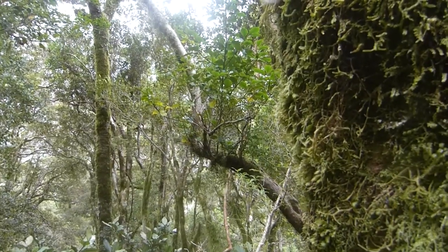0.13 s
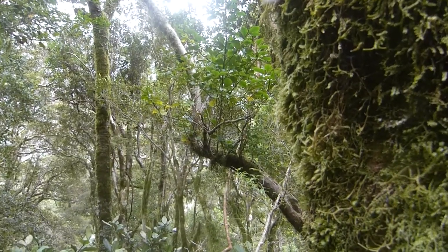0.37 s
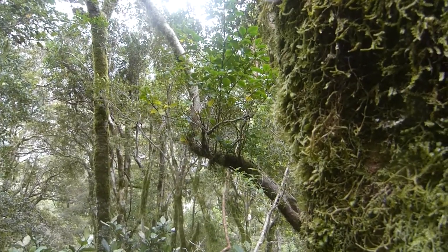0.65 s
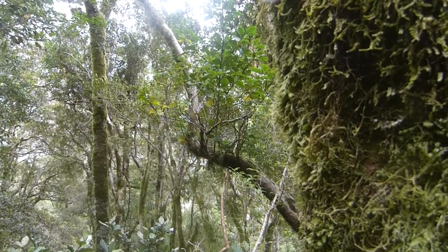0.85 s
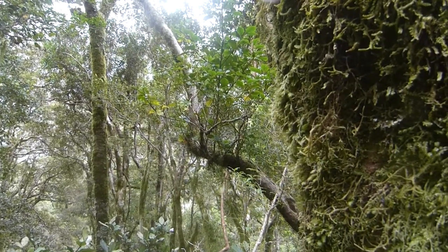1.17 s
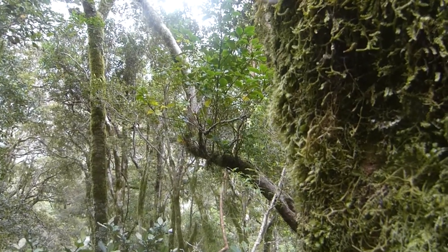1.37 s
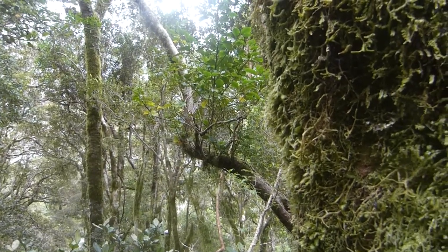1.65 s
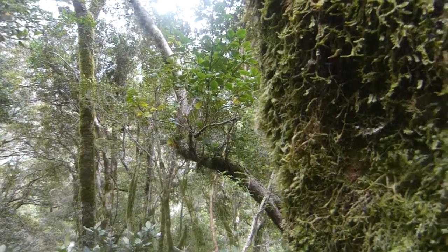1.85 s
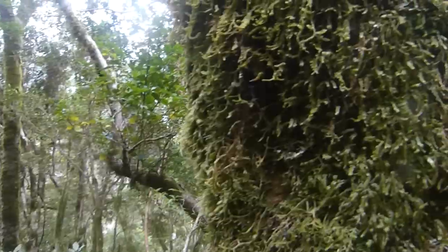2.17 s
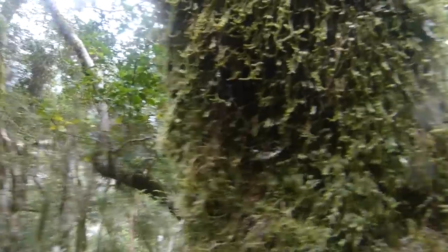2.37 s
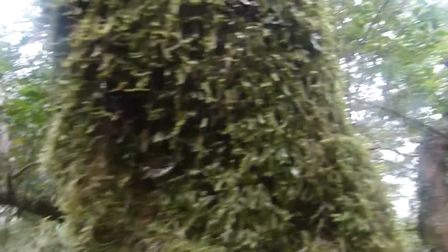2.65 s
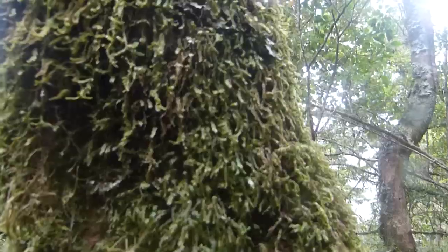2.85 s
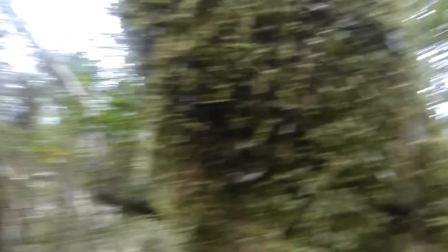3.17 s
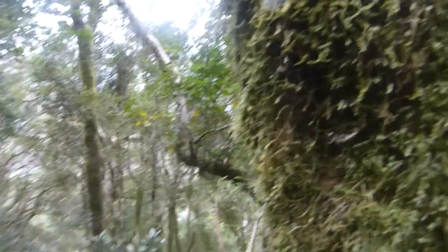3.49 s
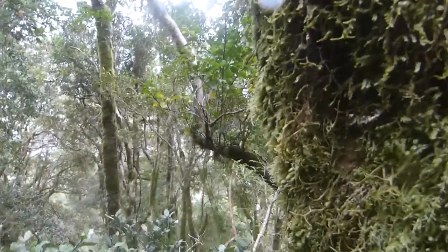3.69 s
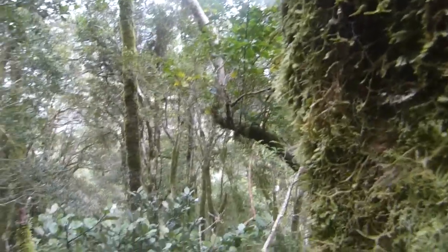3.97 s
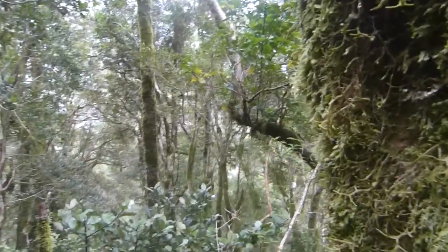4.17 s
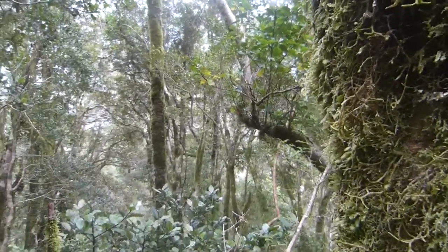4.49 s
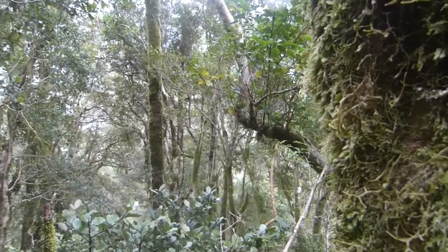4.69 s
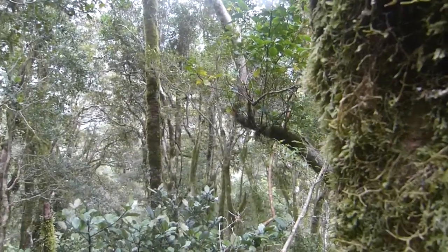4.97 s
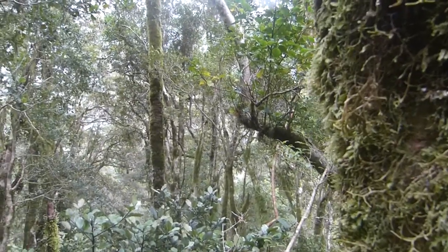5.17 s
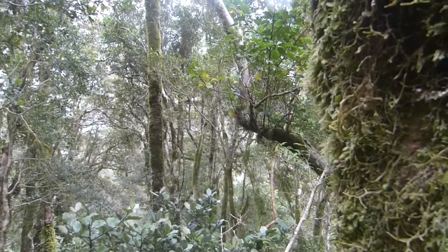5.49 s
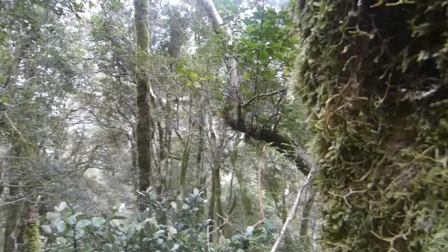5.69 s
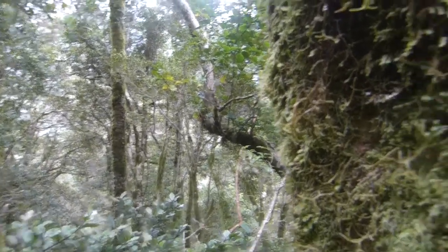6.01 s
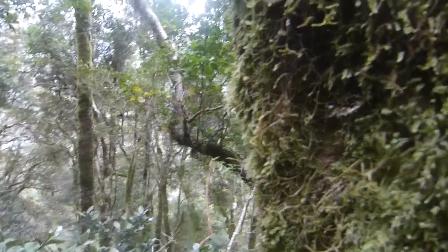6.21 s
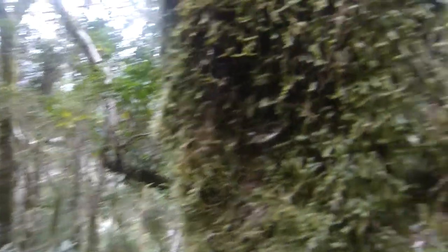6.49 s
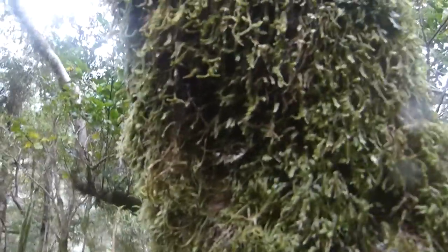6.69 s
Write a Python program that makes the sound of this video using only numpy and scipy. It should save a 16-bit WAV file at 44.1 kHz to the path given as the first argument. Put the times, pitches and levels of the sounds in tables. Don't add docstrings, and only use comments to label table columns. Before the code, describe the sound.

Outdoors in forest, a faint, smooth wash of distant river and leaves runs throughout. A few twig ticks, then jacket rustle, creaks and a dull knock as the hand-held camera turns. Off to the left a stag moans low, climbs in pitch and breaks into a hoarse, ringing roar that echoes among trunks. After a quiet gap, quick finger catches and a scrape on the camera body, then more rustling.

```python
import sys
import numpy as np
from scipy import signal
from scipy.fft import rfft, irfft, next_fast_len
from scipy.io import wavfile
from scipy.ndimage import uniform_filter1d

SR = 44100
rng = np.random.default_rng(int(sys.argv[2]) if len(sys.argv) > 2 else 0)


def waveform_to_disk(signal):
    frames = np.transpose(np.atleast_2d(signal))
    scaled = np.clip(frames, -1, 1) * 32767
    samples = np.round(scaled).astype(np.int16)
    wavfile.write(sys.argv[1], SR, samples)


def voltage_ratio(decibels):
    exponent = np.asarray(decibels, float) / 20
    return 10 ** exponent


N = 302085

# freq_hz, level_db per Hz
WASH_TONE = [(12, -44), (20, -16.5), (113, -12), (141, -5), (291, -5), (364, -1), (468, -2.5), (692, -3),
             (818, -4), (1470, -7), (3490, -19.5), (7620, -21.5), (15700, -33)]
WASH_DB = -53.5
# freq_hz, likeness (-1 to 1)
WASH_LIKENESS = [(60, 0.92), (150, 0.22), (380, -0.47), (950, 0.15), (2380, 0.28), (5980, 0.47),
                 (15000, 0.4)]

# start_s, peak_db, centre_hz,
# pan_db (left over right), width_hz
TICKS = [(0.1812, -42, 2450, -3, 1200), (1.347, -41, 4450, -.5, 3500), (1.5744, -43, 3870, -.5, 1500),
         (1.577, -49, 7350, -.5, 2500), (1.759, -44, 6400, -3, 5000), (1.8824, -42, 7550, -6, 3000),
         (1.882, -40, 3700, -2, 2500), (1.95, -45.5, 6940, -11, 3030), (2.091, -37.5, 2130, 10, 1500),
         (2.2055, -46, 2500, -6, 2500), (2.358, -39, 2280, -1, 2000), (2.691, -42, 3880, -15, 1500),
         (2.798, -40, 6500, -5, 3000), (2.935, -43, 7160, -7, 3970), (3.031, -44, 6000, -4, 3930),
         (3.4185, -31.5, 6212, -5, 2500), (3.543, -46, 4900, 2, 4044), (5.876, -39, 700, 0, 700),
         (5.903, -36.5, 850, 0, 600), (6.04, -51, 6000, -11, 4000), (6.148, -39, 4370, -3, 5000),
         (6.45, -41, 4450, -21, 6000), (6.514, -38.5, 4970, -18, 6000), (6.572, -50, 5940, -12, 5000),
         (6.64, -41, 4500, -15, 6080), (6.677, -40.5, 2840, -18, 3500), (6.732, -40, 5460, -10, 6000)]
# start_s, peak_db, pitch_hz, pan_db
KNOCK = (2.2049, -26.5, 520, -5)
LIPS_T60 = 0.45
# freq_hz, t60_s
FOREST_T60 = [(200, 1.65), (600, 0.55), (900, 1.08), (1300, 0.82), (2400, LIPS_T60), (4000, 0.67),
              (9000, 0.14)]

# start_s, rise_s, hold_s, fall_s, level_db
RUSTLE = [
    (1.93, 0.01, 0.045, 0.061, -63),
    (2.0, 0.037, 0.026, 0.07, -56.5),
    (2.086, 0.015, 0.051, 0.22, -49.5),
    (2.45, 0.099, 0.11, 0.11, -52),
    (2.62, 0.13, 0.26, 0.29, -52),
    (3.17, 0.17, 0.027, 0.61, -48.5),
    (6.44, 0.08, 0.1, .04, -55),
    (6.6, 0.097, 0.03, 0.23, -51.5),
]
# freq_hz, level_db per Hz
CLOTH_TONE = [(60, -45), (200, -8.5), (1650, -7), (2800, -8), (3710, -9.5), (4360, -6.5), (4740, -5.5),
              (5390, -8), (6250, -7.5), (7250, -7), (10500, -15.5), (13000, -23)]
# freq_hz, width_hz, level_db
SLEEVE_MODES = [(950, 150, 5), (1740, 93, 8), (2200, 710, -7.5)]
# start_s, rise_s, hold_s, fall_s, level_db
SLEEVE_RUBS = [
    (6.44, 0.046, 0.15, 0.044, -42.5),
    (6.62, 0.081, 0.035, 0.16, -41.5),
]
# start_s, rise_s, hold_s, fall_s, level_db
CREAKS = [
    (2.083, 0.01, 0.059, .02, -45),
    (2.15, .02, 0.021, .07, -54),
    (2.7, 0.099, 0.0075, .1, -58),
    (3.2, 0.085, 0.045, .15, -76),
]
CREAK_HZ = 5200

# start_s, rise_s, hold_s, fall_s, level_db
ARM_SHIFTS = [
    (1.95, 0.058, 0.045, .03, -69),
    (2.0, 0.23, 0.017, 0.027, -49),
    (2.42, 0.098, .25, .1, -47.5),
]
# freq_hz, level_db
ARM_TONE = [(40, -60), (100, -26), (170, 9.5), (400, 3.5), (900, 9), (1600, -1), (2800, -1), (4000, -20)]

# start_s, rise_s, hold_s, fall_s, level_db
FLEX = [
    (2.0, 0.22, .0, .1, -34.5),
    (2.45, 0.18, 0.016, 0.36, -37),
    (5.845, 0.0058, 0.025, 0.024, -30),
    (5.866, 0.014, 0.046, .03, -27),
    (5.895, 0.022, 0, 0.12, -29.5),
    (6.0, .1, 0.34, 0.22, -49),
    (6.44, .07, .22, .25, -34),
]
# freq_hz, width_hz, level_db
FLEX_MODES = [(706, 91, -2), (402, 160, -18)]
HAND_REST_DB = -56.5
STROKE_DB = 6

# time_s, effort_db, pan_db
ROAR = [
    (2.62, -49, -7),
    (2.85, -44.5, 14),
    (3.1, -41, 8.5),
    (3.22, -28, 11.5),
    (3.38, -27, 10.5),
    (3.6, -21.5, 4),
    (4.0, -20, 4.5),
    (4.6, -21.5, 4),
    (4.86, -50.5, 0.5),
]
# time_s, opening (0-1)
MOUTH = [
    (2.62, 0.37),
    (3.15, 1),
    (3.4, 0.44),
    (3.62, 0.64),
    (3.7, 0.94),
    (3.9, 0.93),
    (4.0, 0.57),
    (4.5, 0.38),
    (4.68, 0.74),
]
# time_s, pitch_hz
PITCH = [(2.619, 98.8), (2.779, 110.4), (2.86, 117.1), (2.9, 132.5), (2.939, 142.7), (3.021, 151.2),
         (3.099, 160.4), (3.16, 175.1), (3.26, 191), (3.3, 203.4), (3.35, 225), (3.4, 241.5),
         (3.441, 249.2), (3.58, 254.2), (3.647, 265.2), (3.7, 253.8)]
# time_s, pitch_hz
UNDERTONE = [
    (3.62, 181),
    (3.865, 181.5),
    (3.875, 366),
    (4.0, 370),
    (4.3, 371),
]
# time_s, steady, lower, chaos (each 0-1)
FOLDS = [(2.6, 1, 0, .3), (3.1, 1, 0, .22), (3.26, 1, 0, .22), (3.33, 1, 0, .35), (3.43, 1, 0, .1),
         (3.59, 1, 0, .1), (3.63, 1, .1, .4), (3.68, .55, .75, .7), (3.84, .35, .75, .75),
         (3.9, .1, .35, 1), (4.24, 0, .3, 1), (4.3, 0, 0, 1)]
NECK_HZ, MAIN_HZ, PALATE_HZ, JAW_HZ = 370, 532, 877, 728
# freq_hz, width_hz, level_db
THROAT = [(203, 200, -18), (275, 49, -2.3), (NECK_HZ, 43, 1.6), (MAIN_HZ, 44.4, 9.1),
          (PALATE_HZ, 28.5, 12.9), (JAW_HZ, 66, -10), (1003, 48, 0), (1298, 66, -3.5), (1503, 81, -3.5),
          (1640, 134, -6.5), (1765, 62, -4), (2003, 80, -12.5), (2277, 101, -9), (2428, 170, -10),
          (2575, 296, -18.5)]
# freq_hz, width_hz, level_db
TOP_CAVITIES = [(2837, 51, -2), (3240, 98, -3.5), (3478, 174, -4), (4023, 152, 3), (4886, 410, -6.5),
                (5340, 120, -10.5), (6135, 120, -11)]
# freq_hz, level_db
NECK_LEAK = [(120, -65), (200, -28.5), (320, -3.5), (450, 2.5), (620, -2.5), (800, -15), (1100, -20),
             (1800, -36), (2600, -82), (3200, -92)]
# freq_hz, width_hz, depth (0-1)
SIDE_POCKETS = [(1117, 234, 0.75), (1454, 81, 0.51), (1876, 126, 1)]
# freq_hz, width_hz
TOP_POCKETS = [(3040, 135), (3750, 150)]
# time_s, depth_db, length_s
CATCHES = [(2.883, 3, 0.029), (3.001, 3.5, 0.044), (3.321, 6.5, 0.084), (3.682, 5, 0.014),
           (3.794, 9.5, 0.017), (3.886, 0, 0.056), (4.013, -0.5, 0.026), (4.157, 0, 0.0076),
           (4.32, -1, 0.019), (4.53, 5, 0.068)]
OPEN_DB = {"chest": -3.5, "neck": -4, "main": -2.5, "palate": 3.5, "jaw": 4.5, "cheek": 7.5, "tongue": 6.5,
           "mouth": 11, "nose": 7.5, "lips": 13, "top": 9, "breath": 3.5}
SHUT_DB = {"chest": 0.5, "neck": -5.5, "main": 1, "palate": -5, "jaw": -3, "cheek": 0.3, "tongue": 2.4,
           "mouth": 0.9, "nose": 1, "lips": -2.5, "top": -32, "breath": -31}
STEADY_DB = {"main": -2, "cheek": 1, "tongue": -3.5, "chest": 0.5, "neck": -11.5, "palate": -6.5, "lips":
             -3, "top": 12}
# freq_hz, level_db per Hz
BREATH_TONE = [(1800, -37), (2600, -11), (3400, 1), (5200, -8), (6800, -0.5), (8400, -2), (10200, -11.5),
               (13000, -17)]
FLARES = {"neck": [(2.92, 17, .05), (3.27, 18, 0.034), (3.7, -9, .08), (3.33, 6, 0.043), (3.9, 8, 0.033),
          (4.0, 6.5, 0.17), (4.24, -12, 0.044), (4.15, 8, 0.074), (4.7, -8, 0.089), (4, 8, 0.044)],
          "main": [(2.73, 11.5, 0.081), (2.84, 2, 0.035), (2.95, 10, 0.039), (3.05, -17, 0.041),
          (3.2, 9, 0.09), (3.36, -14, 0.057), (3.5, -2, 0.025), (3.44, -6, 0.034), (3.635, -1.5, 0.015),
          (3.675, -20, 0.022), (3.72, 6, .025), (3.775, -7.5, .025), (3.84, 4, 0.031), (3.9, -15, 0.028),
          (3.99, 11.5, 0.044), (4.14, -6, 0.062), (4.25, 9, 0.048), (4.33, 9, 0.035), (4.44, 3, 0.043),
          (4.53, -22, 0.027), (4.59, 8.5, .03), (4.64, -9, .015), (4.68, -3, .025)],
          "palate": [(2.95, -5, .2), (3.2, -1, 0.037), (3.36, 3, .1), (3.7, 3, 0.05), (3.8, -2, 0.049),
          (4.13, 8, 0.087), (4.29, -5, .035), (4.4, 4, 0.059), (4.53, -5, 0.038), (4.62, 6.5, 0.043),
          (4.78, -3, 0.09)], "top": [(3.62, -8.5, 0.048), (4.17, 5, 0.043), (4.86, 2, 0.058)]}
BROAD_FLARES = {"mouth": [(2.75, -6, 0.18), (3.25, -9.5, 0.38), (3.43, 10, 0.033), (3.55, 6, 0.058),
                (4.5, -0.5, 0.086), (4.78, -2, 0.062)], "jaw": [(2.9, -7, 0.26), (3.32, -5.5, 0.13),
                (3.47, -10.5, 0.11), (3.62, 8, 0.035), (3.78, 9.5, 0.13), (4.0, 5, .08), (4.2, 10, 0.14),
                (4.6, -5, 0.15)], "cheek": [(2.75, -4, 0.2), (3.03, 1, .04), (3.18, 2.5, 0.03),
                (3.32, -3.5, 0.13), (3.49, 4.5, 0.048), (3.72, 5.5, 0.13), (3.85, -1.5, 0.04),
                (4.05, 5, 0.17), (4.4, 5.5, 0.11), (4.6, -2.5, 0.11)], "tongue": [(2.75, -0.5, 0.24),
                (3.12, -2, .04), (3.27, 3.5, 0.059), (3.45, -8, .05), (3.63, 6, 0.072), (3.8, 3.5, 0.074),
                (4.33, 7, 0.055), (4.65, -7, 0.073)], "nose": [(2.85, 10, 0.11), (3.05, 4.5, 0.085),
                (3.3, 0.5, 0.12), (3.46, 5.5, 0.082), (3.55, -1, .04), (3.8, 7, 0.079), (4.4, 1, 0.28)],
                "lips": [(3.6, 2.5, 0.051), (2.3, 4, 0.14), (3.2, 4, 0.096), (3.9, -2.5, 0.052),
                (4.82, 6, 0.048), (2.93, -15, 0.13), (4.66, 3.5, 0.1), (3.8, 4.5, 0.071)],
                "wall": [(2.78, -9, 0.063), (3.0, 2.5, 0.053), (3.3, -2, 0.076), (4.0, -2, .3),
                (4.5, 2.5, 0.11), (4.74, 5.5, 0.064)], "chest": [(3.4, 2.5, 0.17), (3.48, -9, 0.088),
                (3.3, 5.5, .04), (3.73, 4, 0.12), (4.71, 6, .1), (3.35, 1.5, 0.1), (3.95, 0, 0.082),
                (4.45, 4.5, 0.063)], "breath": [(3.77, 8.5, 0.078), (4.68, 7.5, 0.067)]}
# time_s, freq_factor
TOP_SHIFT = [(3.0, .985), (3.4, .985), (3.6, 1.003), (3.85, 1.01), (4.2, .995), (4.55, .993), (4.8, .98)]
# time_s, gain_db, length_s
TOP_FLARES = [
    [(3.4, 2, .25), (3.85, -5, .15), (4.4, 5.5, .12), (4.66, 11, .06)],
    [(3.35, 7, .08), (4.1, 6.5, 0.19)],
    [(3.3, -1, 0.15), (3.76, 1.5, 0.099), (4.35, -2.5, .15), (4.7, 11, 0.092)],
    [(3.2, -1, 0.09), (3.38, -12, 0.05), (3.82, -4.5, 0.16), (4.2, -0.5, .1), (4.45, -2, 0.12)],
    [(3.25, -5, 0.18), (3.8, -1.5, 0.091), (4.65, 7, .08)],
    [(3.3, -1, .2), (4.65, 6, 0.13)],
    [(3.3, -3.5, .2), (4.55, -0.5, .15)],
]
FITS_DB, FITS_HZ, PATCHY_DB = 1.8, 12.0, 3.0

# time_s, level_db
SCRAPE = [
    (5.845, -64),
    (5.9, -62),
    (5.913, -44),
    (5.93, -41),
    (5.949, -37.5),
    (5.987, -41.5),
    (6.005, -49),
    (6.035, -70),
]
# start_s, peak_db, length_s
SLIPS = [
    (5.8455, -28, 0.0042),
    (5.868, -26.5, 0.0093),
    (5.898, -25, 0.0063),
    (5.904, -25, 0.0032),
]
# freq_hz, width_hz, level_db
SHELL_MODES = [(890, 34, -4), (1500, 510, -9.5), (2730, 160, -2), (3520, 480, -6), (4790, 170, 0.5),
               (5400, 220, -9), (6150, 270, -3.5), (6660, 220, -2.5), (7980, 300, 0), (8260, 160, 0.5),
               (8460, 140, 1), (9340, 400, -15), (10500, 650, -20)]
# time_s, level_db
MOUNT_HUM = [(5.845, -57), (5.885, -53), (5.897, -66), (5.907, -51), (5.936, -45), (5.955, -54),
             (5.98, -63)]
MOUNT_HZ = 163.4

# freq_hz, level_db
BAND_LIMIT = [(15720, 0), (15790, -90)]


def evened(x):
    return x / np.sqrt(np.mean(x ** 2) + 1e-20)


def read(points, hz):
    f, value = np.transpose(points)
    return np.interp(np.log(hz + 1), np.log(f + 1), value)


def follow(t, points):
    return np.interp(t, *np.transpose(points))


def unroll(rows):
    s, *columns = np.transpose(rows)
    t = np.arange(s[0], s[-1], 1 / SR)
    return [t] + [np.interp(t, s, column) for column in columns]


def add(mix, start_s, sound, pan_db=0.0):
    part = mix[:, round(start_s * SR):][:, :np.shape(sound)[-1]]
    panned = sound * voltage_ratio(np.array([[0.5], [-0.5]]) * pan_db)
    part += panned[:, :part.shape[1]]


def drift(size, hz):
    coarse = rng.standard_normal(size // 32 + 2)
    slow = signal.sosfiltfilt(signal.butter(2, hz, fs=SR / 32, output="sos"), coarse)
    return np.interp(np.arange(size) / 32, np.arange(len(slow)), evened(slow))


def strokes(rows):
    t = np.arange(0, N + 16, 16) / SR
    out = 0
    for start, rise, hold, fall, db in rows:
        up = (t - start) / rise
        down = (start + rise + hold + fall - t) / fall
        shape = np.clip(np.minimum(up, down), 0, 1)
        out = out + (voltage_ratio(STROKE_DB * (shape - 1)) - voltage_ratio(-STROKE_DB)) * voltage_ratio(db)
    return np.interp(np.arange(N) / SR, t, out)


def bumps(t, rows):
    return sum(db * np.exp(-((t - s) / length) ** 2) for s, db, length in rows)


def resonate(x, hz, width):
    r = np.exp(-np.pi * width / SR)
    if np.ndim(hz) == 0:
        return 2 * signal.lfilter([1 - r], [1, -r * np.exp(2j * np.pi * hz / SR)], x + 1e-18).real
    turn = np.exp(2j * np.pi * np.cumsum(hz) / SR)
    return 2 * (turn * signal.lfilter([1 - r], [1, -r], x / turn)).real


def body(x, modes, factor=0.99, fits_db=0.0):
    out = 0
    for k, (hz, width, db) in enumerate(modes):
        fits = fits_db * drift(len(x), FITS_HZ) if np.any(fits_db) else 0
        out = out + (-1) ** k * voltage_ratio(db + fits) * resonate(x, hz * factor, width)
    return out


def coloured(x, spectrum):
    size = next_fast_len(len(x))
    return irfft(rfft(x, size) * voltage_ratio(read(spectrum, np.fft.rfftfreq(size, 1 / SR))), size)[:len(x)]


def crackle(size, per_s, spread_db):
    snaps = rng.standard_normal(size) * voltage_ratio(spread_db * np.minimum(rng.exponential(1, size), 4))
    return snaps * (rng.random(size) < per_s / SR)


def wash():
    frames, hz = N // 256 + 5, np.fft.rfftfreq(1024, 1 / SR)
    a, b, c, d, patches = rng.standard_normal((frames, 513, 5)).T
    patches = uniform_filter1d(patches, size=14, axis=0)
    patches = evened(uniform_filter1d(patches, size=20, axis=1))
    same = read(WASH_LIKENESS, hz)[:, None]
    left = a + 1j * b
    right = same * left + np.sqrt(1 - same ** 2) * (c + 1j * d)
    z = np.array([left, right]) * voltage_ratio(read(WASH_TONE, hz)[:, None] + 0.8 * patches)
    out = signal.istft(z, nperseg=1024, noverlap=768)[1][:, :N]
    return voltage_ratio(WASH_DB) * out / np.std(out.mean(0))


def ticks():
    out, t = np.zeros((2, N)), np.arange(600) / SR
    for s, db, hz, pan_db, width in TICKS:
        grain = rng.standard_normal(len(t)) * np.exp(-t / 0.0021)
        snap = resonate(resonate(grain, hz, width), hz, width)
        add(out, s, voltage_ratio(db) * snap / abs(snap).max(), pan_db)
    s, db, hz, pan_db = KNOCK
    u = t - 0.004
    blow = np.cos(2 * np.pi * hz * u * (1 - 90 * u) + 0.5) * np.exp(-(u / 0.0014) ** 2)
    blow += 0.42 * resonate(rng.standard_normal(len(t)), 1600, 3000) * np.exp(-(u / 0.0026) ** 2)
    add(out, s - 0.004, voltage_ratio(db) * blow / abs(blow).max(), pan_db)
    return out


def forest(x):
    taps = np.zeros((2, SR))
    at = np.arange(400, SR - 20, 20) + rng.integers(0, 20, (2, (SR - 401) // 20))
    np.put_along_axis(taps, at, rng.choice([-1.0, 1.0], at.shape), 1)
    taps[1] = 0.4 * taps[0] + 0.92 * taps[1]
    hz, t, z = signal.stft(taps, SR, nperseg=256)
    decay = voltage_ratio(-60 * t / read(FOREST_T60, hz)[:, None])
    tail = signal.istft(z * decay, SR, nperseg=256)[1]
    return signal.fftconvolve(x, tail / np.linalg.norm(tail[0]), axes=1)[:, :N]


def rustle():
    out = np.zeros((2, N))
    hiss = strokes(RUSTLE) * voltage_ratio(1.1 * drift(N, 25))
    creaks = strokes(CREAKS)
    shared = crackle(N, 9000, 1.0)
    for ear in out:
        rub = shared + 1.9 * crackle(N, 9000, 1.0)
        fold = resonate(resonate(rub, CREAK_HZ, 710), CREAK_HZ, 790)
        ear += voltage_ratio(10.5) * hiss * evened(coloured(rub, CLOTH_TONE)) + creaks * evened(fold)
    sleeve = evened(body(crackle(N, 5000, 1.0), SLEEVE_MODES))
    add(out, 0, strokes(SLEEVE_RUBS) * voltage_ratio(2.2 * drift(N, 18)) * sleeve, -0.6)
    return out


def stir():
    out = np.zeros((2, N))
    shuffle = evened(coloured(crackle(N, 4000, 5.7), ARM_TONE))
    add(out, 0, strokes(ARM_SHIFTS) * shuffle, -1.5)
    return out


def flex():
    grip = crackle(N, 3000, 1.3)
    ring = sum(body(resonate(grip, mode[0], mode[1]), [mode]) for mode in FLEX_MODES)
    ring = ring / (uniform_filter1d(ring ** 2, size=700) + 1e-12) ** 0.35
    force = strokes(FLEX) + voltage_ratio(HAND_REST_DB + 1.5 * drift(N, 2.5))
    return force * evened(ring) * np.array([[1], [-1]])


def beat(t, pitch, waver, chaos):
    turns = np.cumsum(follow(t, pitch) * (1 + waver * drift(len(t), 56.6))) / SR
    out = 0
    for k in range(1, 24):
        swell = voltage_ratio(PATCHY_DB * np.sqrt(chaos) * drift(len(t), FITS_HZ))
        out = out + swell * np.cos(2 * np.pi * k * turns)
    return evened(out)


def chaotic_puffs(t):
    turns = np.cumsum(200 * (1 + 0.35 * drift(len(t), 120))) / SR
    shape = 0.87 + np.exp(-(turns % 1) / 0.078)
    return shape * rng.standard_normal(len(t)) * voltage_ratio(0.67 * drift(len(t), 51.0))


def throat(t, drive, part_db, stretch, chaos):
    out = voltage_ratio(bumps(t, BROAD_FLARES["wall"])) * coloured(drive, NECK_LEAK)
    broad = [("chest", THROAT[:2], 1), ("jaw", THROAT[5:6], 1), ("cheek", THROAT[6:7], -1),
             ("tongue", THROAT[7:8], 1), ("mouth", THROAT[8:11], -1), ("nose", THROAT[11:12], 1),
             ("lips", THROAT[12:], 1)]
    for part, modes, sign in broad:
        out = out + voltage_ratio(part_db[part]) * sign * body(drive, modes, stretch, FITS_DB * np.sqrt(chaos))
    for part, mode in zip(("neck", "main", "palate"), THROAT[2:5]):
        fits_db = FITS_DB * chaos * drift(len(t), 2 * FITS_HZ)
        ring = body(resonate(drive, mode[0] * stretch, mode[1]), [mode], stretch)
        out = out + voltage_ratio(part_db[part] + fits_db) * ring
    for hz, width, depth in SIDE_POCKETS:
        out = out - depth * resonate(out, hz * stretch, width)
    return signal.sosfilt(signal.butter(4, [160, 2750], "bandpass", fs=SR, output="sos"), out)


def top_cavities(t, rasp):
    shift = follow(t, TOP_SHIFT)
    out = 0
    for mode, flares in zip(TOP_CAVITIES, TOP_FLARES):
        ring = body(resonate(rasp, mode[0] * shift, mode[1]), [mode], shift, FITS_DB)
        out = out + voltage_ratio(bumps(t, flares)) * ring
    return evened(out)


def roar():
    t, effort_db, pan_db = unroll(ROAR)
    mouth = follow(t, MOUTH)
    s, *shares = np.transpose(FOLDS)
    steady, lower, chaos = (np.interp(t, s, share) for share in shares)
    waver = 0.0245 * chaos
    stretch = 1 + 0.12 * np.maximum(3.27 - t, 0)
    flares = {**FLARES, **BROAD_FLARES}
    part_db = {}
    for part in OPEN_DB:
        opening_db = SHUT_DB[part] + OPEN_DB[part] * mouth
        part_db[part] = opening_db + STEADY_DB.get(part, 0) * steady + bumps(t, flares[part])

    puffs = chaotic_puffs(t)
    drive = steady * beat(t, PITCH, waver, chaos)
    drive = drive + lower * beat(t, UNDERTONE, waver / 5, chaos) + chaos * evened(puffs)
    drive = drive - lower * resonate(drive, UNDERTONE[0][1], 40)

    out = np.zeros((2, N))
    push = voltage_ratio(effort_db - 2.0) * signal.windows.tukey(len(t), 0.07)
    catch_db = bumps(t, CATCHES)
    voice = throat(t, drive, part_db, stretch, chaos)
    voice = voice / np.sqrt(uniform_filter1d(voice ** 2, size=5000) + 1e-12)
    voice = push * voltage_ratio(-catch_db) * voice
    low = signal.sosfiltfilt(signal.butter(4, 185, fs=SR, output="sos"), voice)
    add(out, t[0], voice - low, pan_db - 0.54 * catch_db)
    add(out, t[0], low, 0.083 * pan_db)

    sharp = top_cavities(t, 0.3 * drive + np.sqrt(chaos) * evened(puffs))
    add(out, t[0], push * voltage_ratio(part_db["top"]) * (chaos / np.mean(chaos)) ** 0.25 * sharp, 0.13 * pan_db)
    breath = np.array([evened(coloured(puffs * rng.choice([-1, 1], len(t)), BREATH_TONE))
                       for _ in range(2)])
    add(out, t[0], push * chaos ** 2 * voltage_ratio(part_db["breath"]) * breath, -1.5)
    for hz, width in TOP_POCKETS:
        out = signal.lfilter(*signal.iirnotch(hz, hz / width, SR), out)
    return out


def scrape():
    t = np.arange(5.84, 6.06, 1 / SR)
    slide_db = np.interp(t, *np.transpose(SCRAPE), left=-90, right=-90)
    grip = voltage_ratio(slide_db + 1.4 * drift(len(t), 120))
    for s, db, length in SLIPS:
        u = np.maximum(t - s, 0) / length
        grip = grip + voltage_ratio(db - 13.5) * 4.9 * u * np.exp(-u * u * 2.2)
    out = np.zeros((2, N))
    add(out, t[0], grip * evened(body(crackle(len(t), 25000, 1.1), SHELL_MODES)), 0.3)
    out += 0.22 * (np.roll(out[0], -1) - np.roll(out[0], 1)) * np.array([[1], [-1]])
    t, hum_db = unroll(MOUNT_HUM)
    hum = np.sqrt(2) * np.sin(2 * np.pi * MOUNT_HZ * t + 1.2 * drift(len(t), 26))
    add(out, t[0], voltage_ratio(hum_db) * hum * signal.windows.tukey(len(t), 0.2), 2.2)
    return out


def scene():
    background = wash()
    near = ticks() + scrape()
    near = near + voltage_ratio(-21.0) * forest(near) + rustle() + stir() + flex()
    stag = roar()
    stag = stag + voltage_ratio(-5.0) * forest(stag)
    housing = signal.butter(3, 10000, fs=SR, output="sos")
    return signal.sosfilt(housing, stag + near) + background


def roll_off(x):
    return signal.sosfilt(signal.butter(12, 15890, fs=SR, output="sos"), x)


def record(dry):
    mix = np.array([coloured(ear, BAND_LIMIT) for ear in dry])
    return roll_off(mix)


dry = scene()
out = record(dry)
waveform_to_disk(out)
```